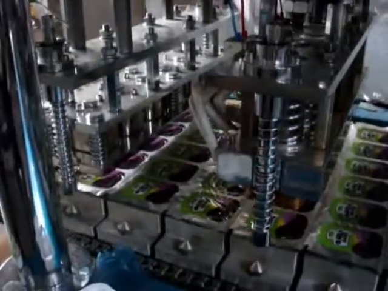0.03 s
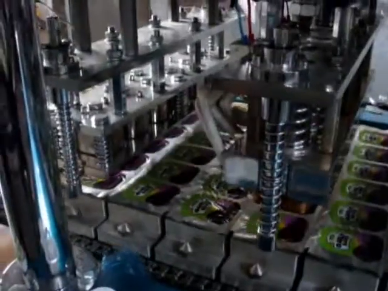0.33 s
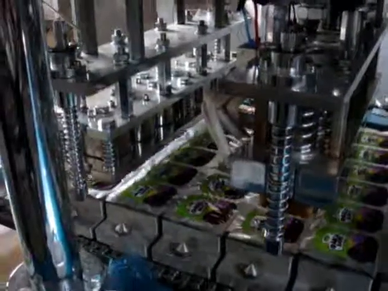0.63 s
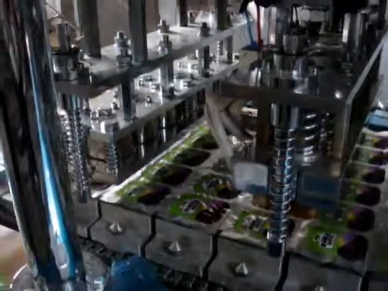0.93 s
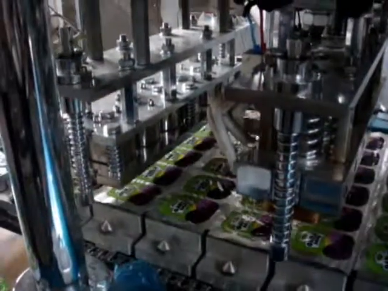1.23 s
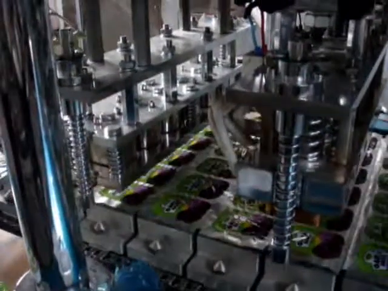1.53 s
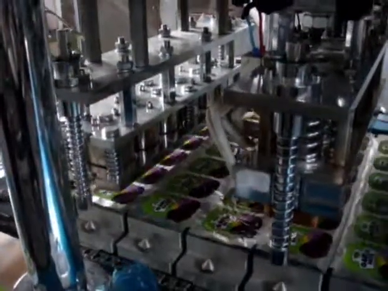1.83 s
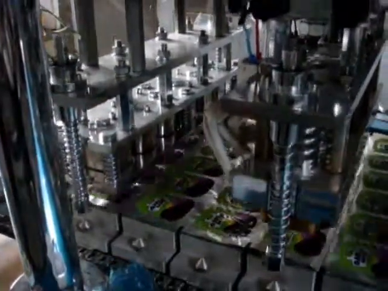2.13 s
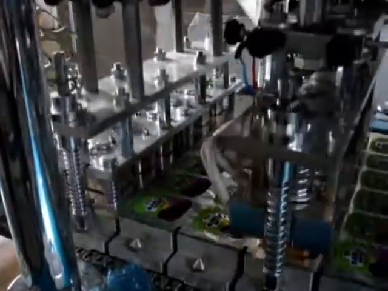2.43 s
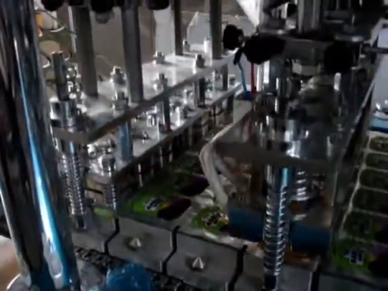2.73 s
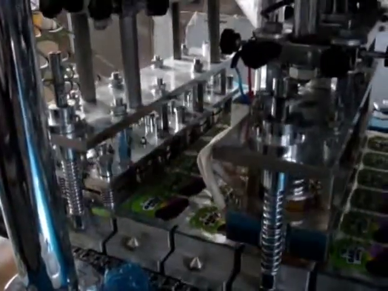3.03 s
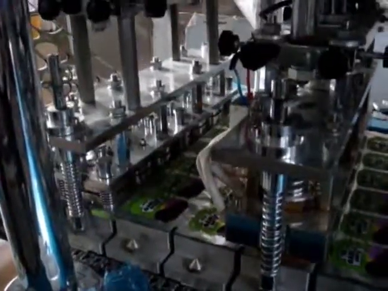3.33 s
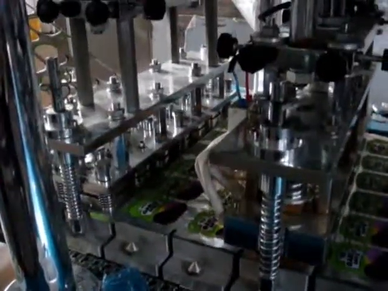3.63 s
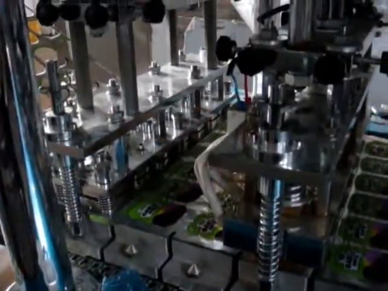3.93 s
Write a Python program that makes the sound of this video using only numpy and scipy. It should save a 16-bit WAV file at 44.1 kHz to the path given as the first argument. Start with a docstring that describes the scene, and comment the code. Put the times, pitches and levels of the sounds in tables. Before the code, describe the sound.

A packaging machine drones and rattles, with a wavering squeal and then sharp air hisses.

```python
"""A factory hall, with a machine that fills and seals cups. A pump hammers through the same run of
knocks every turn, over the roar of the hall. After a first puff of air, the conveyor squeals as it
carries the cups forward, its guides sticking and slipping. Then valves blow off compressed air as
the sealing press comes down, and heavy parts land with dull bumps. The drone of pump and hall
sinks under the loudest sounds."""
import sys
import numpy as np
from scipy import signal
from scipy.fft import rfft, irfft
from scipy.io import wavfile
from scipy.ndimage import map_coordinates

SR = 44100
rng = np.random.default_rng(int(sys.argv[2]) if len(sys.argv) > 2 else 0)


def dump_mix(stems):
    """Bounce the given channels to the path in sys.argv[1] as a 16-bit WAV at rate SR."""
    frames = np.atleast_2d(stems).T  # one column per channel
    limited = np.clip(frames, -1, 1)  # hard clip at full scale
    pcm = np.round(limited * 32767).astype(np.int16)
    wavfile.write(sys.argv[1], SR, pcm)


N = 176400
T = np.arange(N) / SR
HZ = np.maximum(np.arange(N // 2 + 1) * SR / N, 1)


def from_db(db):
    """Turn decibels into a number to multiply by."""
    return 10 ** (np.asarray(db) / 20)


def rms_one(x):
    """Scale a sound to an average power of 1."""
    return x / np.sqrt(np.mean(x ** 2) + 1e-20)


def in_time(rows):
    """Join rows of (seconds, value) with straight lines."""
    return np.interp(T, *np.transpose(rows))


def colour(points):
    """Turn rows of (Hz, dB) into a gain for every frequency."""
    hz, db = np.transpose(points)
    return from_db(np.interp(np.log(HZ), np.log(hz), db))


def resonance(hz, width_hz):
    """A filter that favours one pitch, as a ringing object does."""
    return 1 / (1 + 1j * (HZ ** 2 - hz ** 2) / (HZ * width_hz))


def noise(response):
    """Filtered noise with a power of 1."""
    return rms_one(irfft(rfft(rng.standard_normal(N)) * response, N))


def drift(rate_hz):
    """A random wobble of about 1 either way, mostly slower than rate_hz."""
    return noise(1 / (1 + (HZ / rate_hz) ** 2))


# The knocks in one turn of the pump. Each row: time in seconds, relative strength in dB.
PUMP_KNOCKS = [(.00444, -7.5), (.01342, -7.7), (.01522, 1.9), (.02277, -4.4), (.03326, -5.1),
               (.04107, -1.9), (.04303, -.9), (.04872, -8.1), (.05759, -6.6), (.0599, -12.8),
               (.06702, -6.8), (.07112, -4.9)]
# The strong tones of the pump housing. Each row: multiple of the turn rate, relative level in dB.
HOUSING_TONES = [(8, -55), (13, -49), (18, -50), (23, -44), (26, -39), (29, -40), (30, -36), (41, -38),
                 (42, -41), (44, -38), (45, -36), (47, -41), (48, -44), (49, -42), (50, -41), (51, -35),
                 (52, -29), (53, -34), (54, -30), (55, -32), (56, -28), (57, -55), (58, -30), (59, -30),
                 (60, -30), (61, -20), (62, -32), (63, -27), (64, -34), (65, -30), (66, -55), (67, -40),
                 (68, -30), (70, -40), (71, -32), (73, -33), (98, -47), (99, -48), (123, -40), (143, -39)]
# The tone colour of the rattle. Each row: frequency in Hz, relative level in dB.
RATTLE_COLOUR = [(60, -27), (110, -24), (170, -14.5), (260, -3.5), (400, -0.5), (600, 3.5), (690, -7),
                 (1000, 0.5), (1150, 1.5), (1800, -2), (2500, -4.5), (3400, -12), (3850, -12),
                 (4400, -24.5), (9000, -28)]

def pump():
    """Knocks drive the housing's tones; a bright rattle and a dull exhaust puff repeat every turn."""
    turns_per_s, samples_per_turn = 13.443, 4096
    knock_s, knock_db = np.transpose(PUMP_KNOCKS)
    clock = T + .00001 * drift(18)  # the pump runs a little unevenly
    multiples = np.arange(samples_per_turn // 2 + 1)
    rattle_gains = np.interp(multiples * turns_per_s, HZ, colour(RATTLE_COLOUR))
    rattle_gains *= from_db(1.5 * rng.standard_normal(len(multiples)))
    tones = 0
    for multiple, db in HOUSING_TONES:
        rad_per_s = 2 * np.pi * multiple * turns_per_s
        # The knocks decide where in its swing each tone starts.
        phase = np.angle(np.sum(from_db(knock_db) * np.exp(-1j * rad_per_s * knock_s)))
        tones += from_db(db) * np.sqrt(2) * np.cos(rad_per_s * clock + phase)
        rattle_gains[int(multiple)] = 0  # the rattle leaves room for this tone
    tones *= from_db(.74 + .41 * T + .37 * drift(17))  # slowly growing, and wavering

    one_turn = irfft(rattle_gains * np.exp(2j * np.pi * rng.random(len(multiples))))
    place_in_turn = clock * turns_per_s % 1 * samples_per_turn
    looped = map_coordinates(one_turn, [place_in_turn], order=3, mode="grid-wrap")
    tone_strength = abs(signal.hilbert(tones))
    rattle = rms_one(looped * tone_strength ** .083)  # swells slightly with the tones

    puff_at_s, puff_width_s, puff_hz = .0031, .0049, 197
    turn_s = 1 / turns_per_s
    from_puff_s = (T - puff_at_s + turn_s / 2) % turn_s - turn_s / 2
    puff = np.exp(-(from_puff_s / puff_width_s) ** 2) * np.sin(2 * np.pi * puff_hz * from_puff_s)
    return tones + from_db(-23) * rattle + from_db(-43) * rms_one(puff)


# The tone colour of the hall's roar. Each row: frequency in Hz, relative level in dB.
ROAR_COLOUR = [(25, -30), (45, -32), (65, -20), (100, -19), (160, -4.5), (350, 1.5), (550, 4), (720, 5),
               (900, 4.5), (1200, 2), (1900, -0.5), (2600, -6), (3700, -6), (5000, -10), (7000, -14),
               (9000, -18.5), (10000, -25), (12500, -15.5), (15000, -36)]
# Panels the machine keeps ringing. Each row: pitch in Hz, width in Hz, relative level in dB.
RINGING_PANELS = [(1319.4, 34, -33), (1684, 64, -33.5), (1935, 43, -33.5), (3810, 33, -38.5),
                  (4010, 32, -43.5), (4580, 37, -52)]

def hall():
    """Motors and leaking air all around blur into a roar, with a few ringing panels."""
    roar = noise(colour(ROAR_COLOUR)) * from_db(-17 + 1.1 * drift(25))
    panels = sum(from_db(db) * noise(resonance(hz, width) ** 2) for hz, width, db in RINGING_PANELS)
    return roar + panels


# Blasts of air. Each row: start, rise time and hold time in seconds, sag during the hold in dB,
# fade in dB per second, level in dB, centre in Hz, width in octaves, share of steel ring from 0 to 1.
AIR_BLASTS = [(0.015, 0.011, 0.078, 1, 67, -17, 2180, 0.96, 0.64),
              (2.131, 0.0032, 0.28, 2.5, 115, -17, 6400, 6.3, 0.04),
              (2.374, 0.0092, 0.017, -0.5, 220, -24.5, 4500, 1.2, 0.6),
              (2.466, .008, 0.028, 0, 170, -23, 6500, 1.4, 0.63),
              (2.546, .004, .008, 4, 450, -22, 7000, 1, 0.4),
              (2.714, 0.011, 0.033, -1, 186, -20.5, 10500, 4, 0.26),
              (2.78, 0.01, 0.032, 7, 250, -27, 10000, 0.37, 0),
              (2.947, 0.027, 0.0092, 10, 385, -16, 4330, 0.71, 0.07),
              (3.638, 0.016, .02, 11, 107, -19, 2200, 1.1, 0.83)]
# Where the steel frame rings. Each row: pitch in Hz, width in Hz, relative level in dB.
STEEL_FRAME = [(1790, 200, 2.5), (2524, 51, 5), (2680, 42, 1.5), (3017, 44, 2), (3220, 31, 5),
               (4020, 150, -5.5), (4260, 24, -1), (4725, 25, 1.5), (5120, 30, 1), (5400, 110, -4.5),
               (6600, 220, -12), (6860, 38, 3), (7270, 31, 4.5), (7700, 70, -8), (8900, 55, -9)]

def valves():
    """A blast opens fast, sags as the cylinder empties and dies away; its jet rings the steel frame."""
    frame = sum((-1) ** k * from_db(db) * resonance(hz, width)
                for k, (hz, width, db) in enumerate(STEEL_FRAME))
    jet_limits = 1 + (700 / HZ) ** 4 + (HZ / 10500) ** 20  # little below 700 Hz or above 10500 Hz
    out = 0
    for start, rise, hold, sag_db, fade_db_per_s, db, hz, octaves, ring in AIR_BLASTS:
        opening = np.clip((T - start) / rise, 0, 1)
        open_s = T - start - rise
        fall_db = sag_db * np.clip(open_s / hold, 0, 1) + fade_db_per_s * np.maximum(open_s - hold, 0)
        jet = np.exp(-.25 * (np.log2(HZ / hz) / octaves) ** 2) / jet_limits
        air = np.sqrt(1 - ring) * noise(jet) + np.sqrt(ring) * noise(jet * frame)
        out += air * opening * from_db(db - fall_db + .07 * drift(60.6))
    return out


# The note of the squeal. Each row: time in seconds, pitch in Hz.
SQUEAL_NOTE = [(.25, 1077), (.55, 1084), (.72, 1081), (.87, 1083), (1.04, 1103), (1.15, 1087), (1.22, 1084),
               (1.34, 1073), (1.45, 1064), (1.6, 1077), (1.8, 1079), (2.1, 1094)]
# How loud that note is. Each row: time in seconds, level in dB.
NOTE_LEVEL = [(.3, -31), (.38, -17.5), (.406, -37), (.44, -18), (.474, -38), (.51, -16), (.55, -32),
              (.58, -22), (.65, -16), (.75, -12), (.878, -14), (.914, -23.5), (.97, -13.5), (1.0, -23),
              (1.05, -19), (1.088, -26), (1.115, -12.5), (1.15, -12), (1.196, -15), (1.308, -12.5),
              (1.396, -16.5), (1.452, -22), (1.488, -17.5), (1.518, -21), (1.55, -15.5), (1.626, -15),
              (1.675, -18), (1.704, -38), (1.745, -15.5), (1.78, -14.5), (1.91, -22), (1.95, -38),
              (1.99, -17), (2.026, -31), (2.075, -21), (2.16, -60)]
# How loud the octave above it is. Each row: time in seconds, level in dB.
OCTAVE_LEVEL = [(.1, -39), (.25, -31), (.8, -37.5), (.95, -26), (1.14, -25.5), (1.2, -33), (1.27, -26),
                (1.32, -44), (1.35, -22), (1.4, -29), (1.44, -23.5), (1.54, -24.5), (1.63, -35.5),
                (2.16, -41)]
# Its higher overtones. Each row: multiple of the pitch, level in dB compared with the note.
OVERTONES = [(3, -21), (4, -27.5), (5, -26)]

def conveyor_squeal():
    """A guide sticks and slips as the belt moves: one wavering, raspy note that catches and breaks."""
    pitch_hz = in_time(SQUEAL_NOTE) + 3.29 * drift(25.6)
    phase = 2 * np.pi * np.cumsum(pitch_hz) / SR
    note_db = in_time(NOTE_LEVEL)
    out = from_db(note_db + .9 * drift(25)) * np.sin(phase)
    # A fast wobble in phase makes the upper tones rasp.
    out += from_db(in_time(OCTAVE_LEVEL) + 1.9 * drift(30)) * np.sin(2 * phase + .23 * drift(90))
    for multiple, db in OVERTONES:
        out += from_db(note_db + db + 3.2 * drift(22)) * np.sin(multiple * phase + .54 * drift(90))
    stop_s = NOTE_LEVEL[-1][0]
    return np.sqrt(2) * out * (T < stop_s)


# Squeaks and scrapes. Each row: time of the peak in seconds, spread to either side in seconds,
# pitch in Hz, width in Hz, level in dB.
GUIDE_SQUEAKS = [(0.366, .06, 6300, 300, -37), (1.138, .025, 6450, 350, -36), (1.239, 0.02, 6600, 400, -27),
                 (1.312, 0.05, 6350, 402, -37), (2.051, 0.004, 6460, 3510, -30),
                 (2.737, 0.01, 9550, 400, -20.5), (3.65, 0.019, 4020, 300, -26)]

def guide_squeaks():
    """The conveyor's guides give brief, high squeaks that chatter as they swell and fade."""
    out = 0
    for peak_s, spread_s, hz, width, db in GUIDE_SQUEAKS:
        swell = np.exp(-.5 * ((T - peak_s) / spread_s) ** 2)
        chatter_db = 2.5 * drift(70)
        out += from_db(db + chatter_db) * swell * noise(resonance(hz, width) ** 2)
    return out


# Dull bumps. Each row: start in seconds, fade time in seconds, pitch in Hz, level in dB before fading.
DULL_BUMPS = [(0.431, 0.019, 151, -29), (2.13, 0.014, 110.4, -25.5), (3.04, 0.025, 154, -25),
              (3.76, 0.015, 330, -24)]

def bumps():
    """Heavy parts of the press and the conveyor come to rest with a short, low thud."""
    rise_s = .013
    out = 0
    for start, fade_s, hz, db in DULL_BUMPS:
        age = np.maximum(T - start, 0)
        envelope = np.minimum(age / rise_s, 1) * np.exp(-age / fade_s)
        out += from_db(db) * envelope * noise(resonance(hz, width_hz=100) ** 2)
    return out


# How the drone of pump and hall dips and recovers. Each row: time in seconds, the hall's change in dB.
DRONE_DIPS = [(0, -7.5), (.04, -2), (.19, -4.5), (.32, -1.5), (.6, -1), (.78, -3), (.92, -2), (1.07, -1),
              (1.18, -3), (1.32, -3.5), (1.47, -2), (1.7, -1.8), (1.8, -2.5), (2.02, -1), (2.135, -1.5),
              (2.165, -9.5), (2.36, -7.5), (2.52, -5), (2.72, -1.5), (2.74, -6), (2.85, -2), (2.95, -2.5),
              (2.98, -2), (3.1, -1), (3.5, -1), (4, -1)]

def scene():
    """Mix all the sounds, the same for both ears; the pump dips further than the hall."""
    dip_db = in_time(DRONE_DIPS)
    drone = pump() * from_db(1.37 * dip_db) + hall() * from_db(dip_db)
    mono = drone + conveyor_squeal() + guide_squeaks() + valves() + bumps()
    return np.array([mono, mono])


def record(dry):
    """Round off the peaks, turn the highest treble down and cut off the very top."""
    peak_limit, treble_hz, treble_db, cutoff_hz = .85, 10000, -21, 15200
    rounded = dry / (1 + (dry / peak_limit) ** 6) ** (1 / 6)
    body = signal.sosfilt(signal.ellip(10, .1, 70, treble_hz, fs=SR, output="sos"), rounded)
    treble = signal.sosfilt(signal.butter(8, treble_hz, "high", fs=SR, output="sos"), rounded)
    softened = body + from_db(treble_db) * treble
    return signal.sosfilt(signal.ellip(10, .1, 70, cutoff_hz, fs=SR, output="sos"), softened)


dry = scene()
out = record(dry)
dump_mix(out)
```